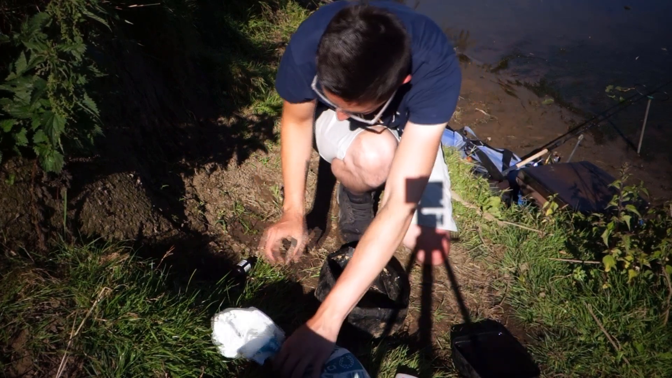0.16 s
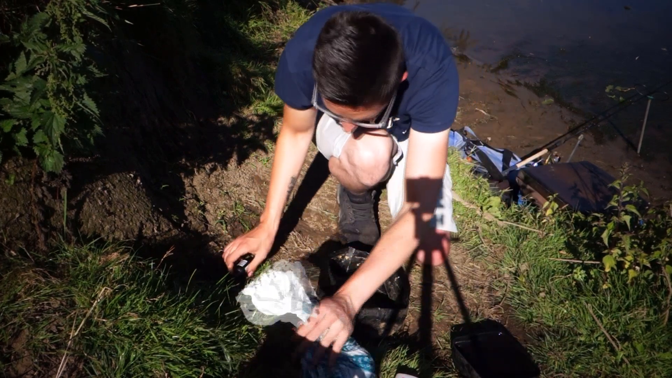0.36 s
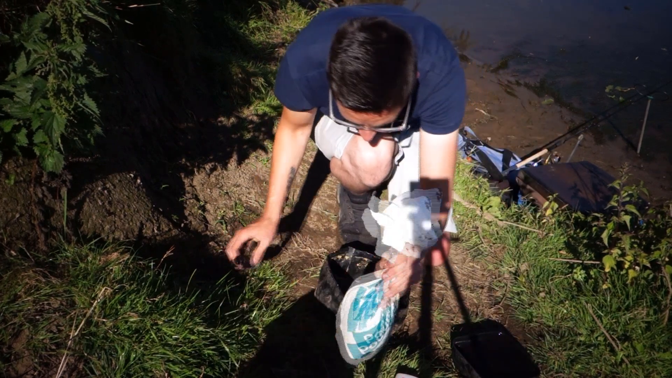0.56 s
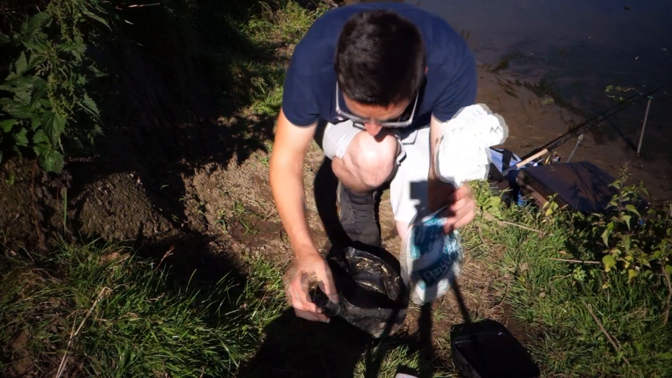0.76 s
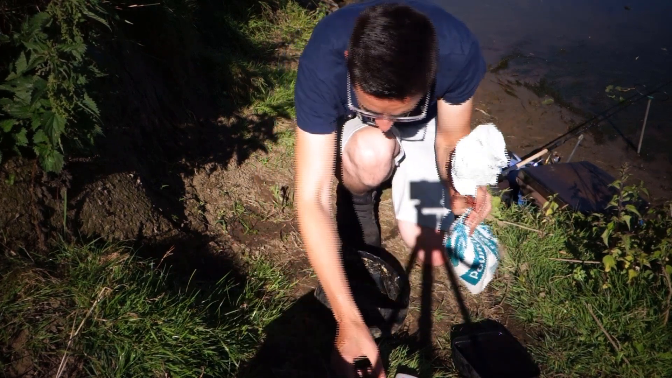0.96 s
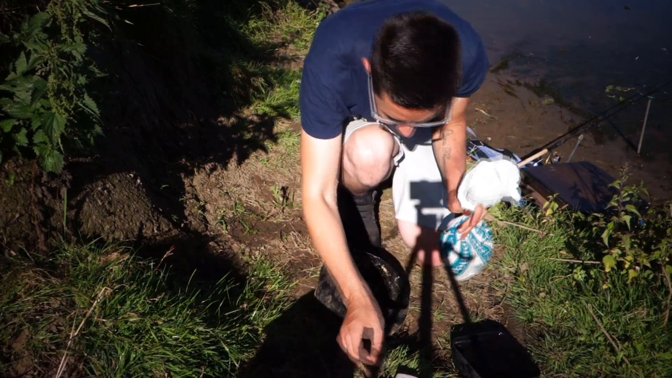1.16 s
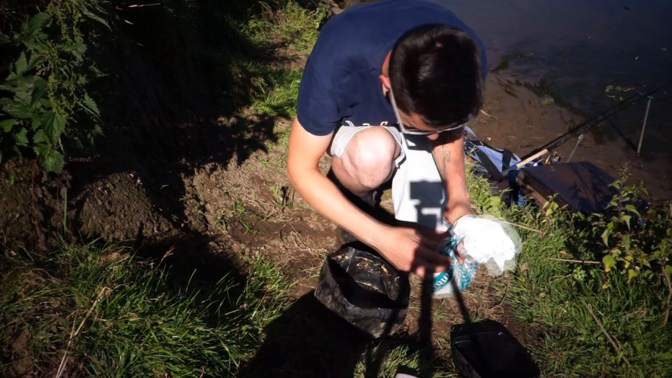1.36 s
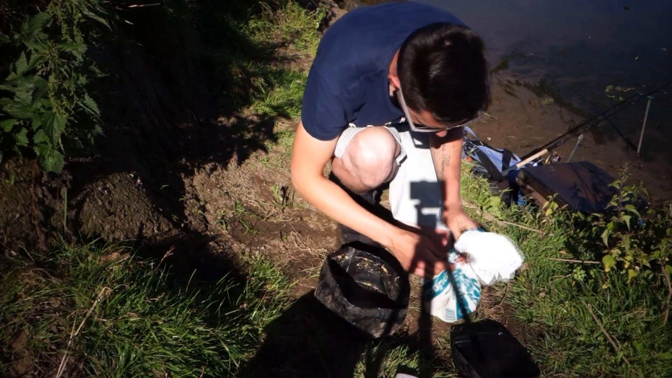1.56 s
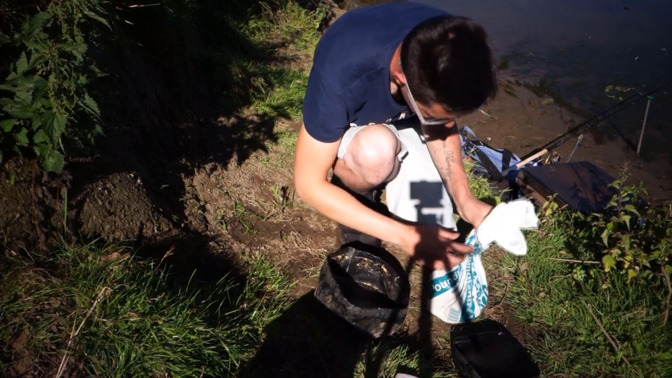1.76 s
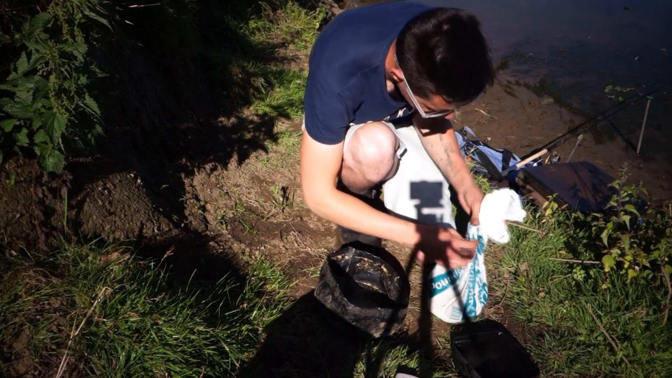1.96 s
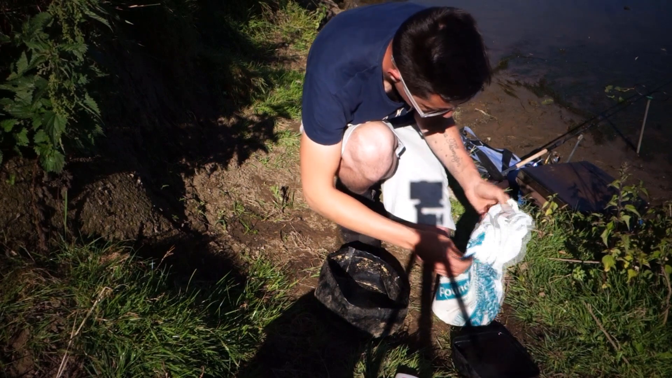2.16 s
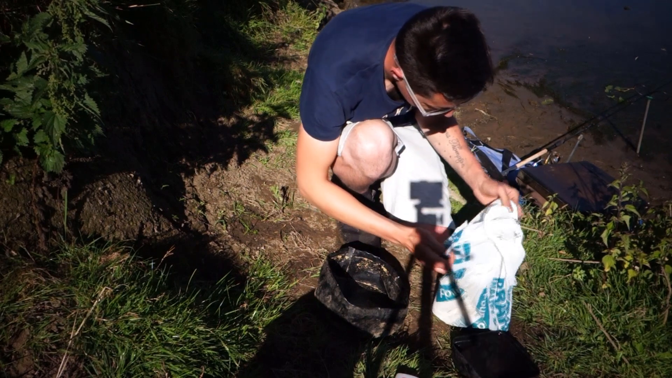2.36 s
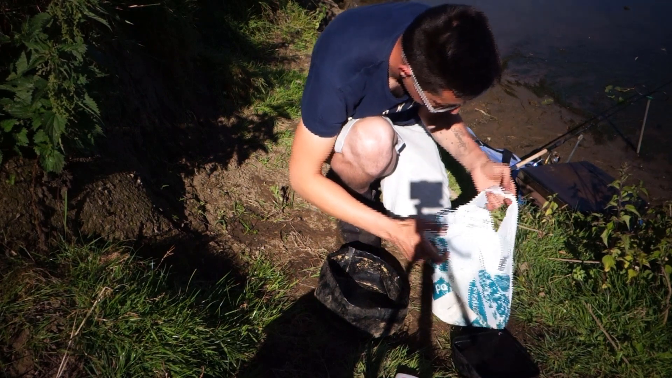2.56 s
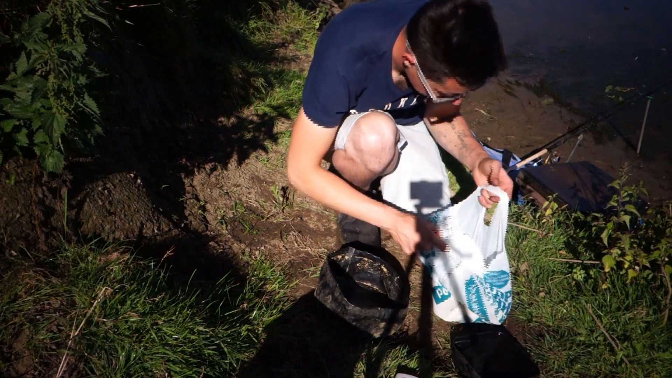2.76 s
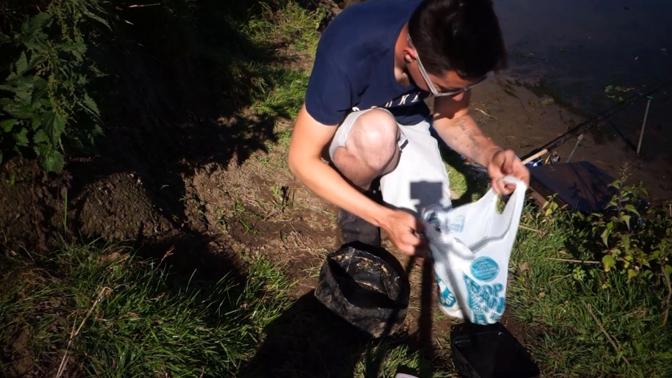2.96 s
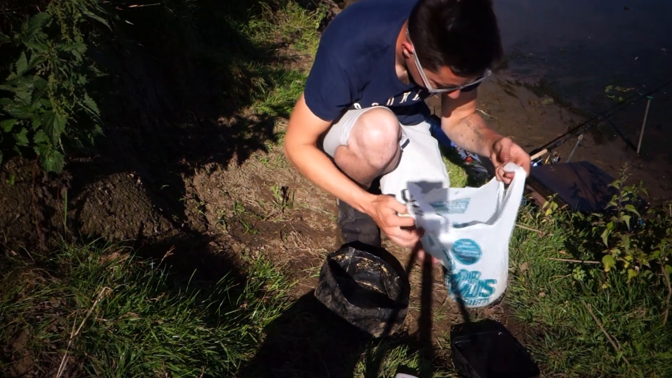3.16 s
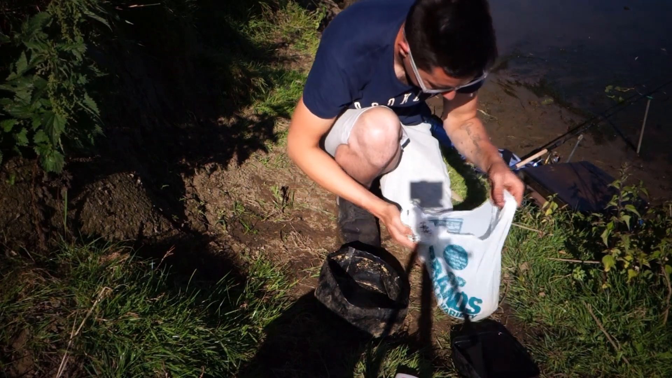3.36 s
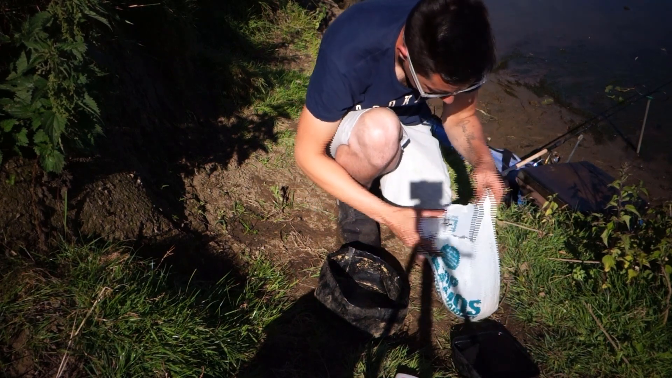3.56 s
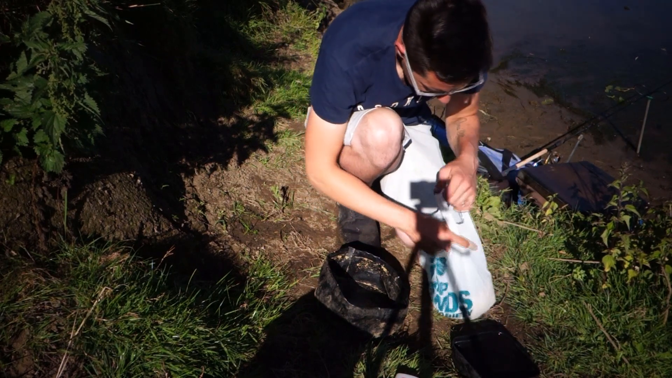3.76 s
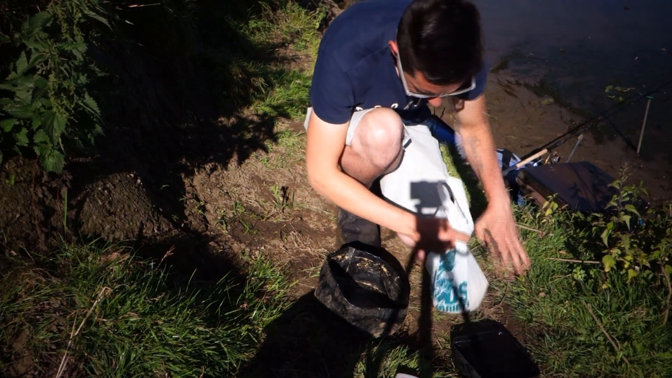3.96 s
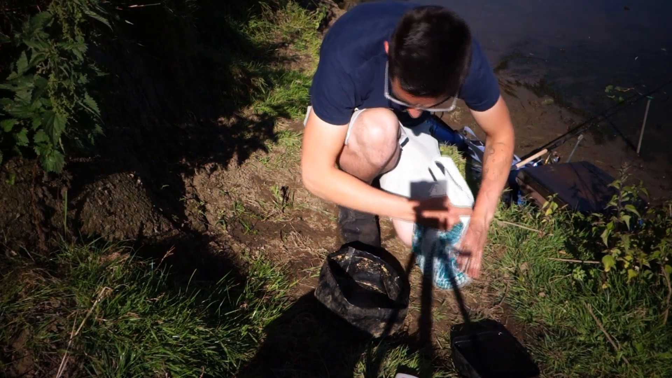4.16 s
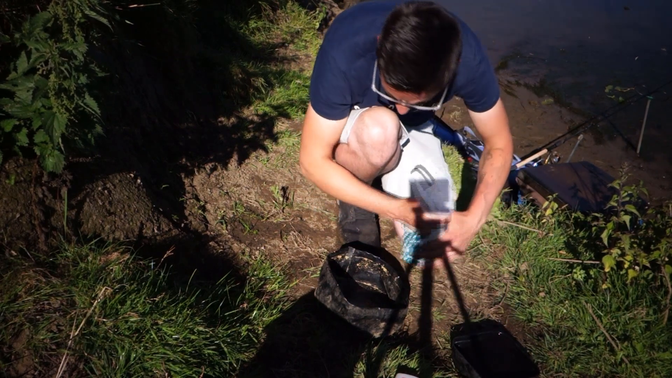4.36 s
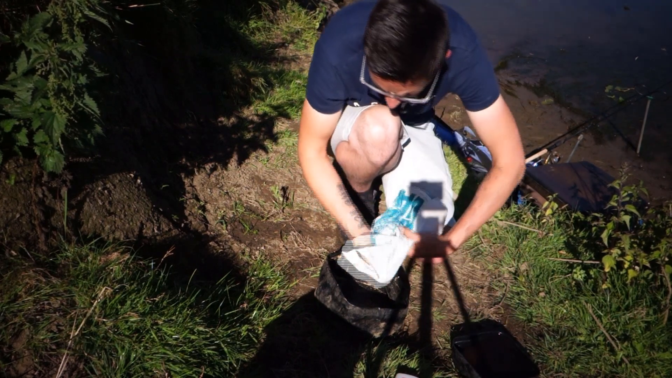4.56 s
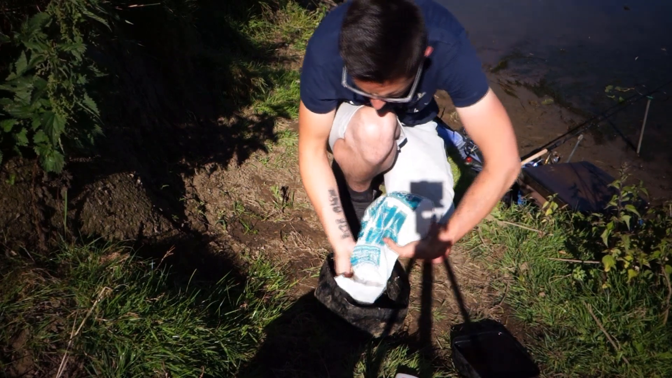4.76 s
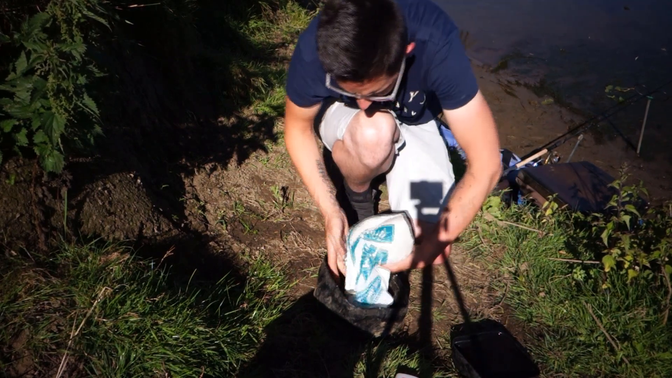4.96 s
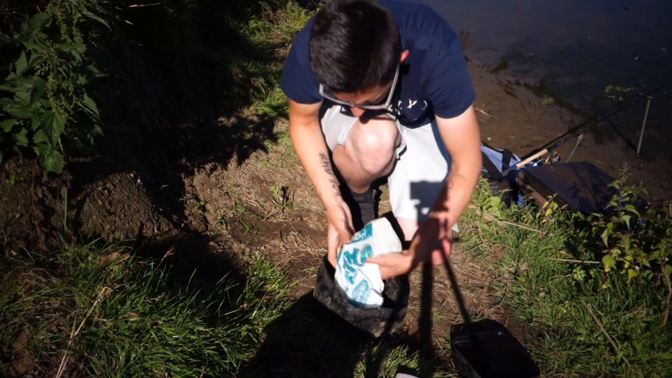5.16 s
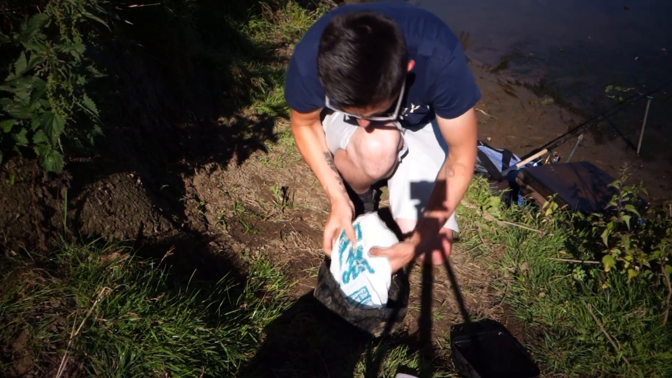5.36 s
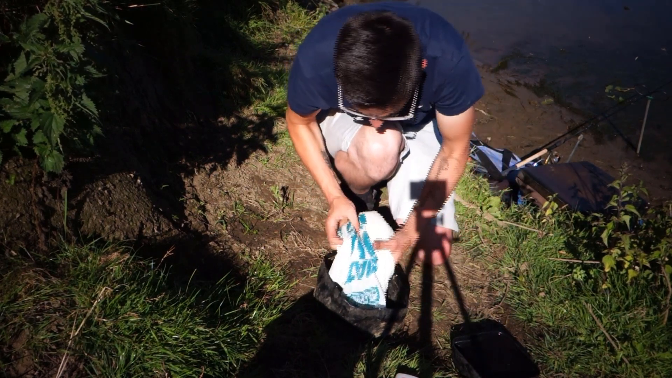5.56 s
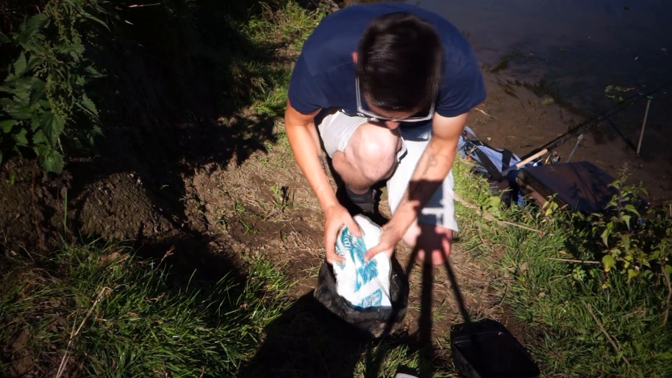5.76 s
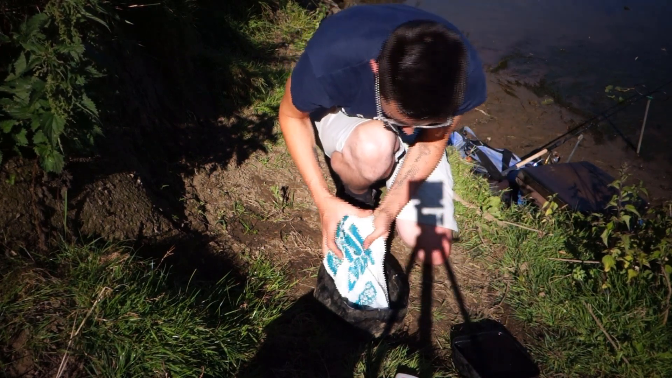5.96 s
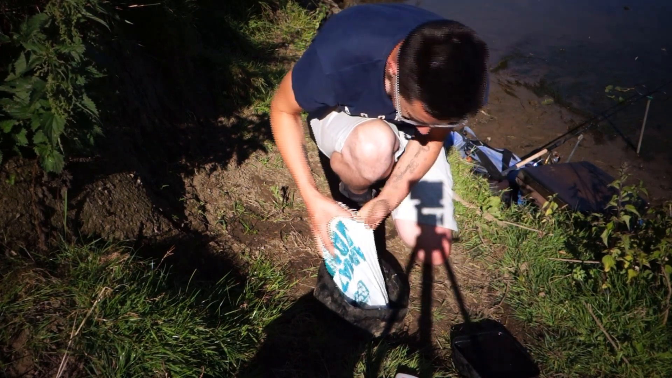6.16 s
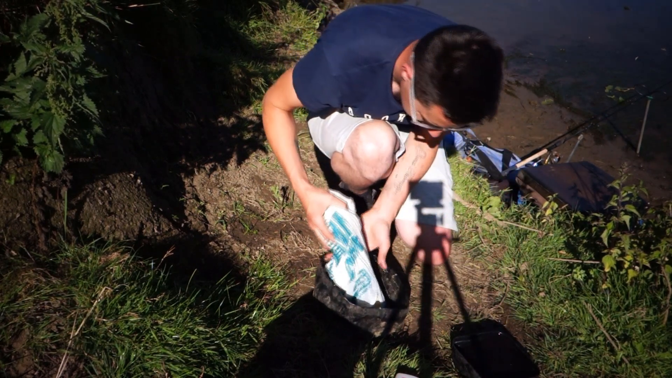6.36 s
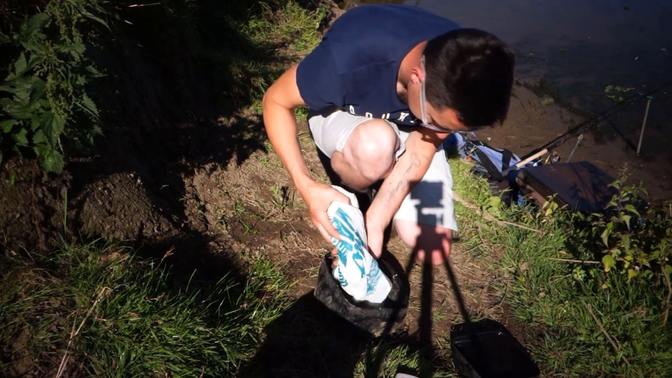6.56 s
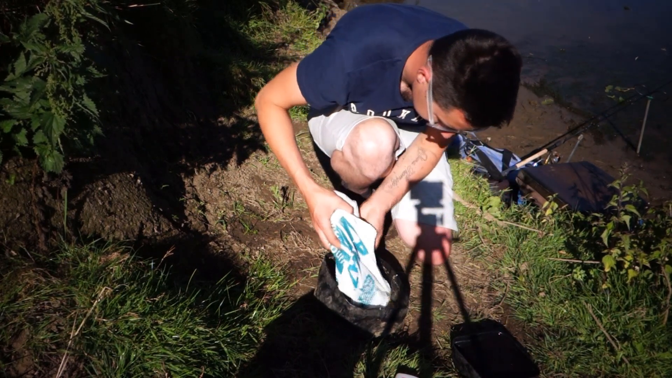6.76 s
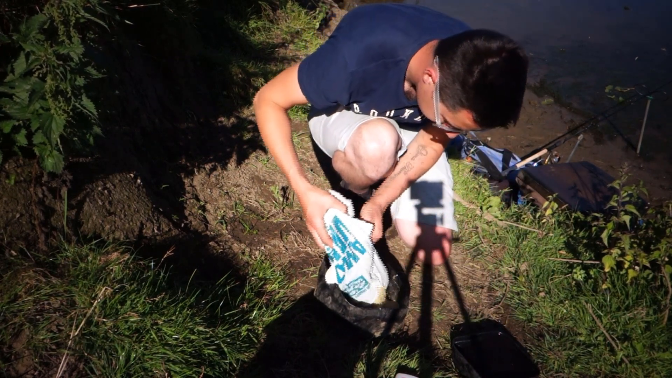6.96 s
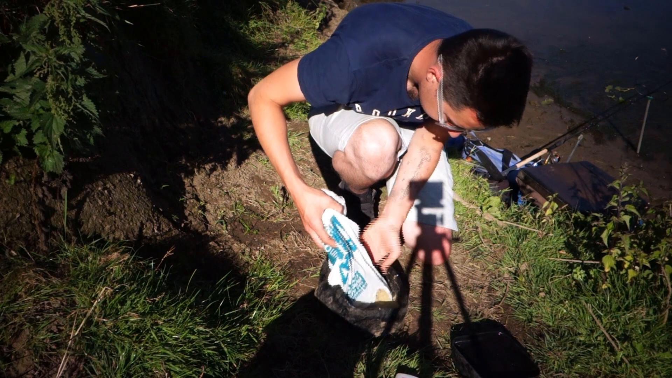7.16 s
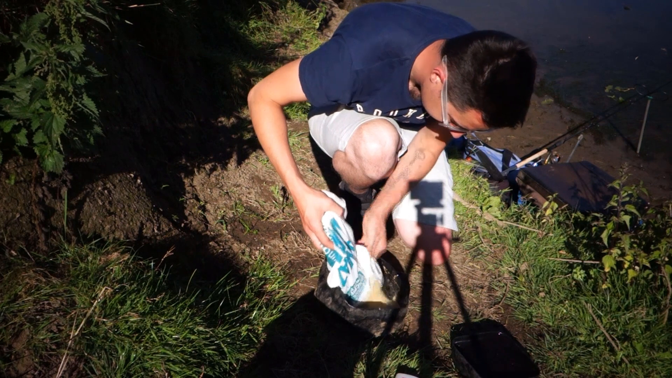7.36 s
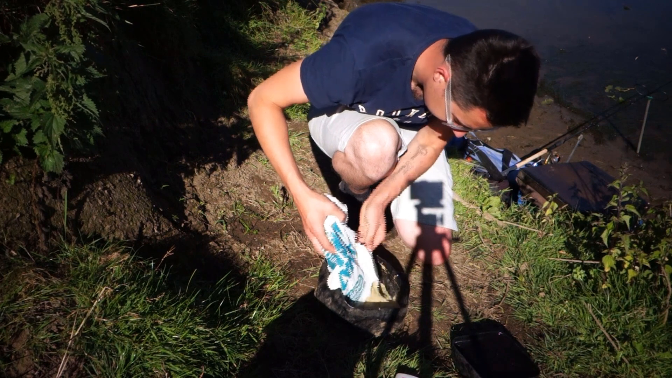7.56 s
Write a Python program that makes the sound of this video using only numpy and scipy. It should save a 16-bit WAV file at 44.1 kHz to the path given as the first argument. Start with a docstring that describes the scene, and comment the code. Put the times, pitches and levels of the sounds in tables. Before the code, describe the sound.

On a quiet riverbank, a close stereo microphone picks up a thin plastic bag being grabbed and lifted with light crackles. A small hard object clinks, then something lands with a hollow knock. The rustling grows loud and bright as the bag is unrolled and opened; dry crumbs slide dully inside. Finally it is tipped and shaken in bursts, crumbs pouring faintly into a bowl over a soft far rush.

```python
"""A thin plastic bag of dry breadcrumb groundbait crinkles as an angler lifts, opens and shakes it into a bowl.
Film: dense random snaps and rub noise, coloured as bright creases and lower folds, driven by hand effort.
Crumbs: sparse dull grains slide inside the bag, then pour into the bowl as a stream with dollops.
Early on a small hard thing clinks and something lands with a hollow knock (struck modes); low bumps are noise.
Behind: a soft far rush of shaped noise and one faint bird note, a wavering sine, on a riverbank."""
import sys
import numpy as np
from scipy import signal
from scipy.fft import rfft, irfft, next_fast_len
from scipy.io import wavfile
from scipy.ndimage import uniform_filter1d, map_coordinates

SR = 44100
rng = np.random.default_rng(int(sys.argv[2]) if len(sys.argv) > 2 else 0)


def dump_mix(stems):
    """Bounce the given channels to the path in sys.argv[1] as a 16-bit WAV at rate SR."""
    frames = np.atleast_2d(stems).T  # one column per channel
    limited = np.clip(frames, -1, 1)  # hard clip at full scale
    pcm = np.round(limited * 32767).astype(np.int16)
    wavfile.write(sys.argv[1], SR, pcm)


N = 336042


def amp(db):
    """Decibels to gain."""
    return 10 ** (np.asarray(db) / 20)


def unit(x):
    """Scale to rms 1."""
    return x / np.sqrt(np.mean(x ** 2) + 1e-20)


def clock():
    """Time of every sample, s."""
    return np.arange(N) / SR


def along(points, hz):
    """Interpolate (Hz, value) points on a log-frequency axis."""
    f, v = np.transpose(points)
    return np.interp(np.log(hz + 1), np.log(f + 1), v)


def curve(rows):
    """Interpolate (s, value) rows to one value per sample."""
    t, value = np.transpose(rows)
    return np.interp(clock(), t, value)


def wobble(rate_hz):
    """Smooth random curve with rate_hz knots a second."""
    return map_coordinates(rng.standard_normal(4096), [clock() * rate_hz], mode="wrap")


def filtered(x, response):
    """Multiply the spectrum of x by a function of frequency."""
    m = next_fast_len(N + 8192)
    hz = np.fft.rfftfreq(m, 1 / SR)
    return irfft(rfft(x, m) * response(hz), m)[..., :N]


def panned(x, left_db):
    """Split a left-right level difference evenly between the channels."""
    left_db = np.atleast_1d(left_db)
    return x * amp(np.array([left_db, -left_db]) / 2)


def leaned(x, balance):
    """Left-right level difference that depends on frequency."""
    return filtered(x, lambda hz: amp(np.outer([1, -1], along(balance, hz)) / 2))


def placed(x, left_db, lag_us):
    """The nearer port hears a sound louder, and lag_us microseconds earlier per decibel."""
    lead = left_db * lag_us * SR / 2e6  # samples, half the lag on each side
    left, right = x
    left = map_coordinates(left, [np.arange(N) + lead], order=3)
    right = map_coordinates(right, [np.arange(N) - lead], order=3)
    return panned(np.array([left, right]), left_db)


def coloured(pair, spectrum, alike):
    """Two unrelated signals become one stereo sound of rms 1, its channels alike by frequency."""
    def mid_side_response(hz):
        turn = np.arccos(np.clip(along(alike, hz), -1, 1)) / 2
        return amp(along(spectrum, hz)) * [np.cos(turn), np.sin(turn)]

    mid, side = filtered(pair, mid_side_response)
    return unit(np.array([mid + side, mid - side]))


def patchy(pair, depth_db, size):
    """Passing resonances: random gain in patches of size (bands, frames)."""
    z = signal.stft(pair, nperseg=256)[2]
    field = uniform_filter1d(rng.standard_normal(z.shape[1:]), size[0], 0)
    field = uniform_filter1d(field, size[1], 1)
    return signal.istft(z * amp(depth_db * unit(field)), nperseg=256)[1][:, :N]


def grains(rate_hz, spread_db):
    """Tiny impacts at random moments, rate_hz a second, each of random size and sign."""
    happens = rng.random((2, N)) < rate_hz / SR
    size = amp(spread_db * rng.uniform(-0.84, 1, N))
    sign = rng.choice([-1, 1], (2, N))
    return unit(happens * size * sign / np.sqrt(rate_hz))


def swell(peak_s, db, rise_s, fall_s):
    """Rounded (Gaussian) rise and fall of level."""
    t = clock() - peak_s
    return amp(db) * np.exp(-(t / np.where(t < 0, rise_s, fall_s)) ** 2)


def burst(peak_s, db, rise_s, fall_s):
    """Pointed (exponential) rise and fall of level."""
    t = clock() - peak_s
    return amp(db) * np.exp(-np.maximum(-t / rise_s, t / fall_s))


def together(levels):
    """Unrelated sounds add by power."""
    return np.sqrt(sum(level ** 2 for level in levels))


def strike(contacts, modes, reach_oct, crack):
    """Each contact rings the modes, favouring those within reach_oct of its own frequency, plus a bright crack."""
    out, t = np.zeros(N + SR), np.arange(SR // 2) / SR
    hz, mode_db, t60_s = np.transpose(modes)[:, :, None]
    for start_s, db, contact_hz in contacts:
        gain = amp(mode_db) / (1 + (np.log2(hz / contact_hz) / reach_oct) ** 2)
        sine = np.sin(2 * np.pi * (hz * t + rng.random(hz.shape)))
        build_up = 1 - np.exp(-t * hz)  # within about a cycle
        ring = (gain * amp(-60 * t / t60_s) * sine * build_up).sum(0) / np.linalg.norm(gain)
        noise = np.diff(uniform_filter1d(rng.standard_normal(len(t) + 1), size=3))
        snap = noise * amp(-60 * t / 0.028)  # t60 28 ms
        out[round(start_s * SR):][:len(t)] += amp(db) * (ring + crack * snap)
    return out[:N]


# far rush level: t/s, level/dB
RUSH_LEVEL = [(0, -60), (1.0, -57), (1.7, -60), (7.62, -60.5)]
# far rush spectrum: f/Hz, density/dB per Hz
RUSH_SPECTRUM = [(25, -28), (90, -23.5), (230, -22), (400, -14), (630, -8.5), (820, -4), (1020, -2),
                 (1250, -4.5), (1600, -13.5), (2400, -18), (3100, -16.5), (4300, -14.5), (7000, -23),
                 (15500, -33.5)]
# likeness of the rush in the two channels: f/Hz, likeness (0..1)
RUSH_ALIKE = [(30, .05), (100, 0.43), (250, 0.77), (1000, 0.72), (5000, 0.091)]
# lean of the rush: f/Hz, left-right/dB
RUSH_SIDE = [(100, -1), (500, -3), (1050, -5.5), (2000, -9), (6000, -1)]


def rush():
    """Soft far rush from the right: shaped noise of slowly wavering level."""
    noise = coloured(rng.standard_normal((2, N)), RUSH_SPECTRUM, RUSH_ALIKE)
    return amp(curve(RUSH_LEVEL) + 0.44 * wobble(3.6)) * leaned(noise, RUSH_SIDE)


# one bird note: t/s, f/Hz, level/dB, half length/s
BIRD_NOTE = (0.105, 3100, -66, .025)


def bird():
    """Thin note: a sine of jittering pitch under a Gaussian envelope."""
    peak_s, pitch_hz, db, half_length_s = BIRD_NOTE
    jittered_hz = pitch_hz * (1 + .02 * wobble(250))
    note = np.sin(2 * np.pi * np.cumsum(jittered_hz) / SR)
    return swell(peak_s, db, half_length_s, half_length_s) * note


# the hand closes on the bag: from/s, to/s
GRAB_SPAN = (0.267, 0.292)
# steady rustle as the bag is lifted, unrolled, opened, turned over, held above the bowl: t/s, level/dB
HANDLING_LEVEL = [(0.32, -51.5), (0.65, -46.3), (0.86, -57), (1.3, -48), (1.61, -49), (1.72, -40.5),
                  (2.5, -33.5), (2.98, -36.5), (3.77, -39), (4.21, -44.9), (4.69, -46.5), (4.95, -35),
                  (5.37, -41), (5.92, -43.5), (6.27, -35.5), (6.67, -43), (6.9, -36.8), (7.6, -41.5)]
# tugs and shakes: peak t/s, level/dB, fall/s
TUG_EVENTS = [(0.454, -46, 0.076), (0.599, -37.5, 0.027), (0.801, -49, 0.033), (0.998, -46, 0.072),
              (1.353, -46, 0.016), (1.448, -43.5, 0.028), (1.538, -45, 0.055), (1.659, -40.6, 0.023),
              (2.12, -36.5, 0.046), (2.301, -33, 0.075), (2.743, -37.5, 0.031), (3.111, -33.5, 0.066),
              (3.297, -40, 0.051), (3.709, -41, 0.081), (3.945, -35.8, 0.056), (4.061, -35, 0.073),
              (4.395, -38.5, 0.097), (5.074, -41, 0.093), (5.506, -37, 0.059), (5.61, -36, 0.039),
              (5.75, -36.5, 0.057), (5.985, -35, 0.065), (6.215, -37.6, 0.031), (6.426, -34.5, 0.051),
              (6.734, -39.5, 0.027), (6.964, -39, 0.078), (7.103, -37, 0.041), (7.268, -39, 0.027),
              (7.529, -35.5, 0.059)]
# sudden collapses of the film: peak t/s, level/dB, fall/s
CRUMPLE_EVENTS = [(0.457, -40.6, 0.017), (2.561, -32.6, 0.027), (2.622, -30.6, 0.026), (2.947, -31, 0.014),
                  (3.136, -31.5, 0.024), (3.416, -32.2, 0.05), (3.498, -31.0, 0.047), (3.962, -28.5, 0.04),
                  (4.388, -33.7, 0.017), (5.396, -32.5, 0.055), (7.288, -33.1, 0.012), (7.41, -31, 0.015)]
TUG_RISE_PER_FALL, CRUMPLE_RISE_S = 1.48, .008


def hands():
    """How hard the film is worked: steady handling, tugs and sudden collapses, summed by power."""
    steady = np.interp(clock(), GRAB_SPAN, (0, 1)) * amp(curve(HANDLING_LEVEL))
    tugs = [swell(s, db, TUG_RISE_PER_FALL * fall_s, fall_s) for s, db, fall_s in TUG_EVENTS]
    crumples = [burst(s, db, CRUMPLE_RISE_S, fall_s) for s, db, fall_s in CRUMPLE_EVENTS]
    return together([steady] + tugs + crumples)


# crease spectrum: f/Hz, density/dB per Hz
CREASE_SPECTRUM = [(150, -47), (500, -37), (1500, -19), (2500, -11.5), (3500, -4.5), (5000, -3), (7500, 0),
                   (11000, -0.5), (13000, -0.8), (14500, -5), (15800, -7.5)]
# broad fold spectrum: f/Hz, density/dB per Hz
FOLD_SPECTRUM = [(100, -42), (240, -26), (360, -13), (650, -9.5), (1100, -1), (1600, -1), (2200, 1.9),
                 (3500, -1), (5000, -5.5), (8000, -20), (15000, -47)]
# broad fold level at ordinary effort, lowest while lifted and unrolled: t/s, level/dB
FOLD_BALANCE = [(0.3, -17), (1.12, -8.5), (1.42, -24), (2.3, -12.5), (3.2, -11), (4.15, -13.5), (4.42, -10),
                (5.4, -11.3), (7.62, -14)]
# likeness of near sounds in the two channels: f/Hz, likeness (0..1)
NEAR_ALIKE = [(100, 0.78), (500, 0.95), (1100, 0.87), (3300, 0.96), (5000, 0.87), (7500, 0.77),
              (13000, 0.86), (15800, 0.54)]
ORDINARY_EFFORT_DB = -40
GENTLE_DULLS = 0.26  # exponent: gentler effort raises folds relative to creases


def bag():
    """Small creases snap brightly, broad folds lower; harder handling makes snaps denser and brighter."""
    effort = hands()
    vigour = effort / amp(ORDINARY_EFFORT_DB) + .05
    rub = rng.standard_normal((2, N))  # film on film
    snaps = unit(grains(6000 * vigour ** .5, spread_db=6) + 0.87 * rub)
    # a stiff ridge buckles in a short run of snaps, clearest in gentle motion
    buckles = (rng.random(N) < 40 / SR) * rng.random(N)
    decay = np.exp(-np.arange(SR // 50) / (SR * 0.001))  # 1 ms
    runs = signal.fftconvolve(buckles, decay)[:N]
    crackle = unit(snaps * (1 + 0.74 * runs / vigour ** 0.66))
    # the film changes shape, so its resonances come and go
    creases = coloured(patchy(crackle, depth_db=1.26, size=(4, 12)), CREASE_SPECTRUM, NEAR_ALIKE)
    folds = coloured(patchy(snaps, depth_db=2.5, size=(3, 24)), FOLD_SPECTRUM, NEAR_ALIKE)
    fold_gain = amp(curve(FOLD_BALANCE)) / vigour ** GENTLE_DULLS
    # creases give way in clumps
    flutter = amp(0.52 * wobble(25) + 0.33 * wobble(70) + 0.23 * wobble(400))
    return effort * flutter * (amp(0.4) * creases + fold_gain * folds)


# soft low bumps of handling: peak t/s, level/dB
BUMP_EVENTS = [(0.897, -74), (0.99, -78), (5.625, -72)]
# bump spectrum: f/Hz, density/dB per Hz
BUMP_SPECTRUM = [(40, -20), (90, -7), (160, 1), (260, -12), (500, -35)]


def bumps():
    """Dull low bumps with no ring: short bursts of low noise."""
    level = together([burst(s, db, rise_s=.008, fall_s=.025) for s, db in BUMP_EVENTS])
    return level * coloured(rng.standard_normal((2, N)), BUMP_SPECTRUM, NEAR_ALIKE)


# contacts of a small hard thing: t/s, relative level/dB, strongest f/Hz
CLINK_CONTACTS = [(0.921, -37, 3300), (0.9305, -29.5, 4400), (0.933, -30, 4400), (0.9368, -30.5, 3300),
                  (0.9468, -24, 6100), (0.9492, -25, 5900)]
# its modes: f/Hz, relative level/dB, t60/s
CLINK_RINGS = [(3070, -1, 0.055), (3530, -0.5, .025), (4220, 1, 0.026), (5270, -1, 0.025), (5950, -1, .022),
               (6550, -4, .016), (7050, -5, .016), (8400, -9, .015)]


def clink():
    """A small hard thing: quick contacts each excite a narrow range of high modes."""
    return amp(-1.5) * strike(CLINK_CONTACTS, CLINK_RINGS, reach_oct=0.31, crack=0.48)


# knock and its bounce: t/s, relative level/dB, strongest f/Hz
KNOCK_CONTACTS = [(1.2708, -28.5, 1600), (1.2875, -41.5, 253)]
# its modes: f/Hz, relative level/dB, t60/s
KNOCK_RINGS = [(197, -20, .24), (286, -8, .22), (505, 0, .07), (567, -3, .055), (780, -13, .05),
               (1230, -14, .03), (1620, -18, .025), (2020, -12, .025), (2520, -8.5, .026), (2690, -7, .026),
               (3700, -15, .02), (4800, -8, .02)]


def knock():
    """Something tossed down: a contact and its bounce excite hollow low modes and short upper ones."""
    return amp(1.1) * strike(KNOCK_CONTACTS, KNOCK_RINGS, reach_oct=1.0, crack=0.76)


# mix sliding inside the bag: t/s, level/dB
SLIDE_LEVEL = [(2.0, -80), (2.55, -65), (3.25, -70.5), (3.7, -54.5), (3.92, -60), (4.07, -52.5), (4.4, -64),
               (4.7, -75)]
# sliding spectrum before the pitch shift: f/Hz, density/dB per Hz
SLIDE_SPECTRUM = [(100, -35), (250, -22), (400, -10), (520, 0.5), (620, -4), (800, -9), (1500, -15),
                  (4000, -48)]
# air pocket in the bag rings higher as it is squeezed: t/s, f/Hz
POCKET_PITCH = [(2.0, 448.6), (3.5, 521.4), (3.95, 498.5), (4.25, 624)]
# the bag is turned over: from/s, to/s
TIPPING_SPAN = (4.8, 5.1)
# stream running into the bowl: t/s, level/dB
STREAM_LEVEL = [(4.8, -70), (5.1, -62.5), (5.85, -64), (6.05, -58), (6.65, -56.5), (7.1, -61.5),
                (7.62, -60)]
# dollops of mix dropping into the bowl: peak t/s, level/dB
DOLLOP_EVENTS = [(5.03, -58), (6.0, -56), (6.28, -54.5), (6.6, -57), (6.92, -55), (7.28, -59), (7.55, -59)]
# landing spectrum: f/Hz, density/dB per Hz
BOWL_SPECTRUM = [(100, -34), (290, -21), (430, -4), (600, 2), (780, 3), (950, -20), (1500, -14), (2200, 2),
                 (3000, -28), (6000, -40)]


def crumbs():
    """Countless dull little impacts: sliding in the bag gives way to a stream and dollops in the bowl."""
    tipped = np.interp(clock(), TIPPING_SPAN, (0, 1))
    slide = coloured(grains(2500, spread_db=11.0), SLIDE_SPECTRUM, NEAR_ALIKE)
    # varying read speed moves the 520 Hz spectral peak to the pocket's pitch
    read_at = np.cumsum(curve(POCKET_PITCH) / 520)
    sliding = np.array([map_coordinates(side, [read_at], mode="wrap") for side in slide])
    landing = coloured(grains(2000, spread_db=11.0), BOWL_SPECTRUM, NEAR_ALIKE)
    stream = tipped * amp(curve(STREAM_LEVEL))
    dollops = [swell(s, db, rise_s=.03, fall_s=.07) for s, db in DOLLOP_EVENTS]
    pour = together([stream] + dollops)
    inside = (1 - tipped) * amp(curve(SLIDE_LEVEL)) * sliding
    return amp(1.6 * wobble(30)) * (inside + pour * landing)


# position of bag, crumbs and bumps: t/s, left-right/dB
BAG_PLACE = [(0.3, 1), (1.24, -4), (2.42, -3.5), (3.6, -2), (4.07, -3.5), (5.01, -1.2), (6.42, -1.1),
             (7.62, -1.5)]


def scene():
    """Close sounds, mostly a little to the right, over the riverbank's rush and bird."""
    background = rush() + bird()
    handled = placed(bag() + bumps() + crumbs(), curve(BAG_PLACE), lag_us=5.7)
    struck = panned(clink(), left_db=-3.0) + panned(knock(), left_db=-2.5)
    return background + handled + struck


# balance of the two microphone ports: f/Hz, left-right/dB
PORT_BALANCE = [(300, 2), (1100, -0.5), (1800, 0), (4500, 0), (6800, 0.8), (8600, -1), (10500, -.5),
                (12800, 0), (15500, -0.5)]
TOP_HZ = 15830


def record(dry):
    """Each port has its own colour; nothing passes above TOP_HZ."""
    return filtered(leaned(dry, PORT_BALANCE), lambda hz: hz < TOP_HZ)


dry = scene()
out = record(dry)
dump_mix(out)
```